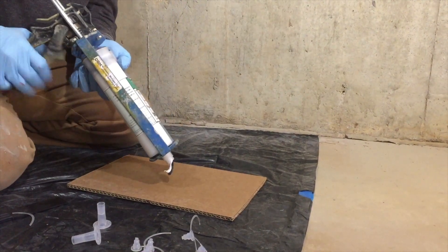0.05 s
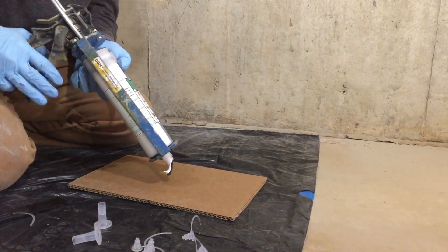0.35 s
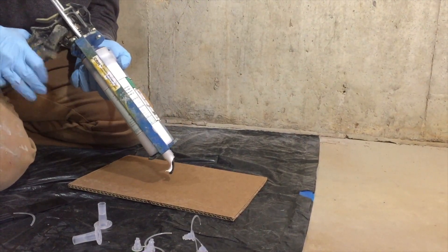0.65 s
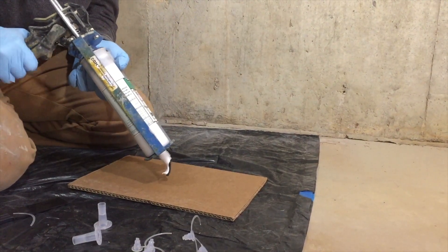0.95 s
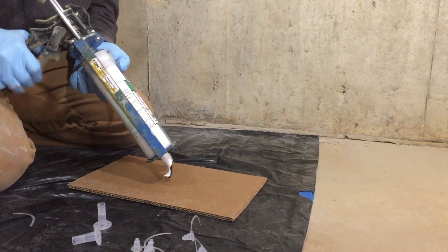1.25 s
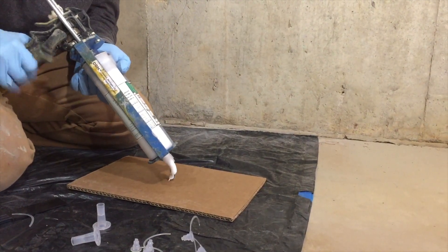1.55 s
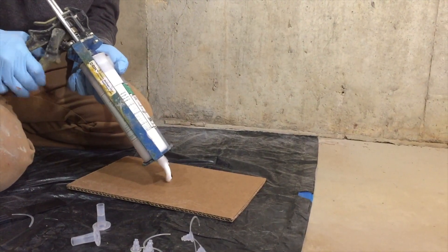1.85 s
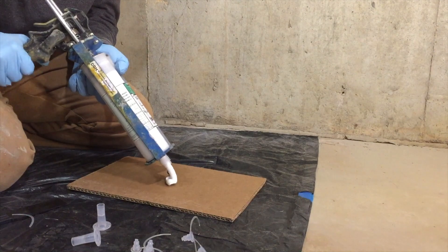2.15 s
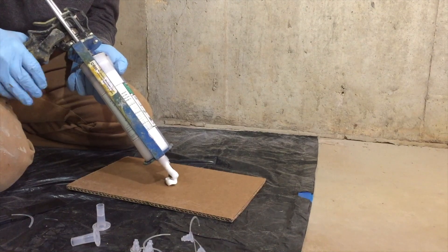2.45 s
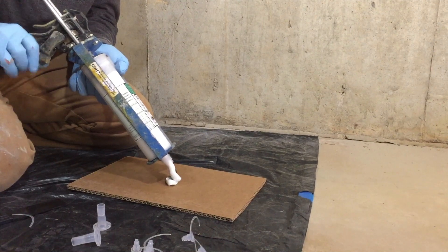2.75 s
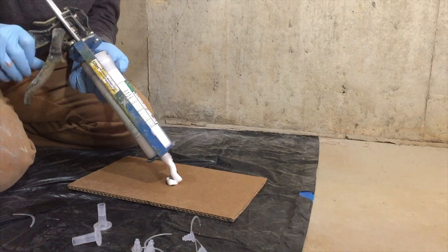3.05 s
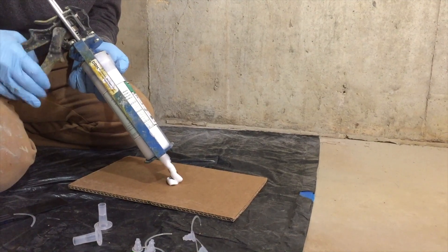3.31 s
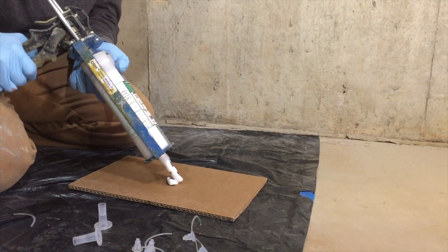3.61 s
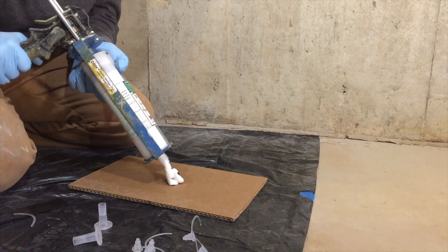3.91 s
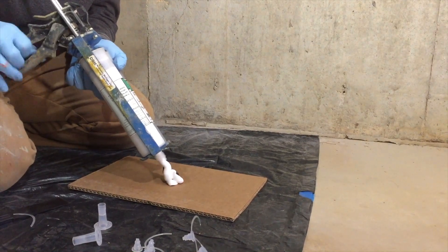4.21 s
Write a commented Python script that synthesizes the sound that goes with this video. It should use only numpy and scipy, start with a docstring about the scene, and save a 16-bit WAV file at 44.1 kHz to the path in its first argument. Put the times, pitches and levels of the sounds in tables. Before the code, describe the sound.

A hand-pumped dispensing gun is squeezed close to the microphone in a concrete basement, with a short echo and a quiet, steady rumble and electrical hum. In the first 0.8 seconds its plungers give brief high squeaks and let go with two sharp plastic snaps, at about 0.1 and 0.5 seconds, the loudest sounds, while the steel lever clacks several times. Light ticks follow, then a weaker snap at 1.4 seconds, a squeak at 1.6 and a single clack at 1.9. Around 2.6 seconds paste crackles very softly out of the nozzle. Near 3 seconds comes a quick falling squeak with a cluster of clacks, then a couple of faint ticks. Another falling squeak and light clicks come at about 4 seconds. Rubber gloves and sleeves rustle softly throughout, with a few dull bumps of hand and knee.

```python
"""A concrete basement, one microphone close to a hand-pumped two-cartridge dispensing gun.
Over room rumble and faint mains hum, the plungers squeak and let go with two sharp snaps while the
steel lever and drive plates clack. Lighter clacks, a weak third snap and more squeaks follow.
Near 2.6 s paste crackles softly from the nozzle; the gun squeaks and clacks again near 3 s and 4 s.
Gloves and sleeves rustle throughout, with a few soft bumps of hand and knee."""
import sys
import numpy as np
from scipy import signal
from scipy.fft import rfft, irfft
from scipy.io import wavfile

SR = 44100
rng = np.random.default_rng(int(sys.argv[2]) if len(sys.argv) > 2 else 0)


def store_wav(level_fs):
    """Save 16-bit WAV to argv[1]."""
    pcm = np.round(np.clip(np.atleast_2d(level_fs), -1, 1) * 32767)
    wavfile.write(sys.argv[1], SR, pcm.T.astype(np.int16))


N = 188351
TIME = np.arange(N) / SR

# room tone of the basement: (frequency [Hz], relative level [dB])
AIR_SPECTRUM = [(5, -1.5), (13, 8), (18, -1), (24, -9), (34, -6), (45, -15), (66, -10), (110, -22),
                (160, -20.5), (350, -30), (600, -30), (1000, -41), (2100, -38.5), (3200, -45), (4700, -40),
                (6000, -46), (16000, -56)]
# colour of the room's tail: (frequency [Hz], gain [dB])
TAIL_COLOUR = [(100, -5.5), (1000, 0), (3000, -5), (5200, -5.5), (6200, -6.5), (8800, -12), (11000, -8),
               (15000, -19)]
# reflections off the nearby floor and wall: (delay [s], gain [dB])
EARLY_ECHOES = [(.0033, -18.5), (.0072, -20), (0.0128, -12.5), (0.0184, -18), (0.027, -14.5)]
# hand and knee: (time [s], level [dB], half length [s], band centre [Hz])
SOFT_BUMPS = [(0.101, -60, 0.0091, 160), (0.157, -64, 0.018, 200), (0.324, -55.5, 0.0062, 204),
              (0.696, -54, 0.0037, 187), (0.81, -64.5, 0.017, 216), (1.33, -62.5, 0.013, 181),
              (1.503, -66.5, 0.039, 166), (1.908, -49, 0.0028, 164), (2.065, -60, 0.026, 230.5),
              (2.363, -74.5, 0.25, 66.5), (2.988, -57.5, 0.013, 200), (3.547, -63, 0.026, 177)]
# sleeves brushing: (frequency [Hz], relative level [dB])
CLOTH_SPECTRUM = [(60, -4), (160, -3.5), (350, -3), (800, 5), (1400, -0.5), (2500, -2), (8000, -28.5)]
# rubber friction of gloves and plungers: (frequency [Hz], relative level [dB])
RUBBER_SPECTRUM = [(400, -37.5), (1400, -11.5), (2800, -5.5), (4800, -4.5), (6200, -15.5), (11000, -19),
                   (15000, -49.5)]
# hands and arms moving: (crest time [s], rise [s], fall [s], sleeve level [dB], glove level [dB])
ARM_MOVES = [(0.11, 0.37, 0.32, -66.5, -65), (0.43, 0.1, 0.17, -49.5, -61), (0.63, 0.23, 0.2, -81, -63.5),
             (0.85, 0.17, 0.14, -71.5, -53.5), (1.35, 0.075, 0.043, -66.5, -69),
             (1.53, 0.16, 0.15, -68.5, -59.5), (2.00, 0.15, 0.1, -65, -69.5),
             (2.76, 0.45, 0.05, -78.5, -73), (3.00, .05, 0.085, -62, -59), (3.54, 0.026, 0.16, -77.5, -75),
             (3.828, 0.12, 0.055, -80, -80), (4.26, 0.26, 0.059, -91, -69.5)]
# paste leaving the nozzle: (crest time [s], rise [s], fall [s], level [dB])
PASTE_SPURTS = [(2.56, 0.08, 0.091, -70), (2.73, 0.066, 0.089, -72.5), (3.83, 0.059, 0.045, -83)]
# plungers rubbing: (time [s], rise [s], fall [s], first pitch [Hz], crest pitch [Hz], last pitch [Hz],
# level [dB], first overtone gain [dB], roughness [factor])
PLUNGER_SQUEAKS = [ (0.0540, 0.027, 0.0074, 6300, 6520, 6800, -49, -35, 0.36),
                   (0.0816, 0.0053, 0.015, 6420, 6620, 6426, -35, -39, 0.26),
                   (0.2520, .024, .038, 1853, 2408, 2340, -37.5, -6, 0.84),
                   (0.4466, 0.0015, 0.017, 6100, 5650, 5320, -41, -17, 0.3),
                   (0.4670, 0.0031, 0.01, 11200, 10810, 10940, -33, -35, 0.63),
                   (0.6300, 0.039, 0.03, 2690, 2585, 2564, -49.5, -33, 0.67),
                   (1.044, .008, 0.026, 2405, 2897, 3050, -58, -16, 1.23),
                   (1.554, 0.0048, 0.0046, 7200, 5190, 4320, -47, -28, 1.04),
                   (1.5640, 0.0077, 0.036, 2410, 2281, 2637, -52.5, -9, 1.23),
                   (1.5853, 0.0064, 0.012, 2712, 2703, 2735, -31, -10, 0.36),
                   (1.6010, 0.0096, 0.0085, 2660, 2672, 2800, -42, -9, 0.67),
                   (2.9188, .005, 0.0061, 5487, 4880, 2290, -28, -19, 0.67),
                   (2.929, 0.01, 0.0073, 1893, 1720, 1700, -47, -25, .65),
                   (4.0326, 0.0036, 0.0018, 9100, 8580, 8140, -27, -29, 0.29),
                   (4.0370, 0.006, 0.0019, 8710, 4460, 4220, -28.5, -16, 0.32),
                   (4.0450, 0.0031, 0.0089, 4160, 3660, 3510, -38, -31, 0.77),
                   (4.2210, 0.006, 0.012, 2780, 3160, 2990, -55, -12, 1)]
# resonances of the gun's frame: (frequency [Hz], width [Hz], gain [dB])
FRAME_MODES = [(1390, 400, -3.5), (1784, 130, 6.5), (2380, 930, 4), (3143, 300, 13.5), (3195, 240, 13),
               (4170, 550, 10), (5070, 1600, -4.5), (7530, 260, 1.5), (10000, 600, -18.5)]
# lever and drive plates meeting: (time [s], play taken up beforehand [s], level [dB], decay [s],
# treble gain [dB], bass gain [dB], lever ring gain [dB])
STEEL_CLACKS = [ (0.0135, 0.0068, -35.5, 0.0036, -2, -0.5, -22), (0.1289, 0, -35.5, .004, -12, 5.5, -3),
                (0.3178, 0.0013, -31.5, 0.0054, 6, -4, -15), (0.3972, 0, -43.5, 0.0035, 11, -16, 0),
                (0.6952, 0.0023, -29.5, 0.0092, 3.5, -1, -16), (0.7824, 0.0046, -37.5, 0.004, 4.5, 4.5, -2),
                (1.054, 0, -57.5, .006, -13, -20, -7), (1.1039, 0.013, -51, 0.0032, -30, 7, 1.5),
                (1.2131, 0.0034, -56, 0.013, 8.5, -29, -18), (1.271, 0, -60.5, 0.0084, 8, -13, -18),
                (1.3090, 0.0069, -55, 0.002, 10, -3.5, -5), (1.4064, 0, -40, 0.0032, -30, 3, -14.5),
                (1.9057, 0.0044, -33.5, 0.0058, 7.5, 4.5, -5), (2.338, 0.0026, -60, .0035, 17, 1, -8),
                (2.916, .011, -41.5, 0.011, -1.5, 0.5, 3.5), (2.937, 0.012, -47.5, 0.031, 2, -11, -17.5),
                (2.9687, 0.004, -38, 0.0069, 1, -1.5, -1), (3.2450, 0, -56.5, 0.0034, 1, 10, -1.5),
                (3.2930, 0.0017, -54, 0.014, -6, 7, 6), (4.0293, 0.0039, -52, 0.0065, -1.5, 5, 13.5),
                (4.119, 0, -52.5, 0.005, -13, -12, -14), (4.222, 0.0061, -55.5, 0.0065, -20, -16, -26)]
# modes of the plastic cartridge: (frequency [Hz], relative level [dB], time to fall 60 dB [s])
CARTRIDGE_MODES = [(1720, -7, 0.01), (2890, 1, 0.008), (3665, 3.5, 0.037), (4390, 1.5, 0.025),
                   (5110, -1, 0.01078), (7200, -19, 0.008), (10200, -20, 0.028)]
# plungers letting go: (time [s], level [dB], ring length [factor], crack gain [dB], pitch [factor])
PLUNGER_SNAPS = [(0.1288, -17.5, 0.85, -7, .99), (0.5042, -19.5, 0.85, -6.5, 0.99),
                 (1.4051, -31, 0.65, -20, 1.05)]


def from_db(db):
    """Decibels to gain."""
    return 10 ** (np.asarray(db) / 20)


def unit_rms(x):
    """Scale to an rms of 1."""
    return x / np.sqrt(np.mean(x ** 2) + 1e-20)


def at_hz(points, hz):
    """Read a table on a log-frequency axis."""
    frequencies, values = np.transpose(points)
    return np.interp(np.log(np.maximum(hz, 1)), np.log(frequencies), values)


def coloured(noise, spectrum):
    """Give a noise its spectrum, at an rms of 1."""
    gain = from_db(at_hz(spectrum, np.fft.rfftfreq(N, 1 / SR)))
    return unit_rms(irfft(rfft(noise) * gain, N))


def drift(per_s):
    """Random wander with an rms of 1, heading for a new value per_s times a second."""
    return unit_rms(np.interp(TIME * per_s, np.arange(N), rng.standard_normal(N)))


def filtered(x, hz, kind, order=2):
    """Causal Butterworth filter."""
    return signal.sosfilt(signal.butter(order, hz, kind, fs=SR, output="sos"), x + 1e-18)


def resonance(x, hz, width_hz):
    """Two-pole resonance with a peak gain of 1."""
    radius = np.exp(-np.pi * width_hz / SR)
    feedback = [1, -2 * radius * np.cos(2 * np.pi * hz / SR), radius ** 2]
    return signal.lfilter(np.array([1, 0, -1]) * (1 - radius ** 2) / 2, feedback, x + 1e-18)


def add(out, start_s, sound):
    """Mix a short sound in."""
    i = max(round(start_s * SR), 0)
    out[i:i + len(sound)] += sound[:N - i]


def swells(rows, swell_db=13.5):
    """Gain of swells that climb swell_db over their rise and lose it over their fall; powers add."""
    power = 0
    for crest, rise, fall, db in rows:
        away = np.maximum((crest - TIME) / rise, (TIME - crest) / fall)
        power += from_db(db - swell_db * away) ** 2
    return np.sqrt(power)


def room_tone(air_db=-57, hum_hz=120, hum_db=-72.5):
    """The basement by itself: rumbling air and mains hum."""
    air = from_db(air_db) * coloured(rng.standard_normal(N), AIR_SPECTRUM)
    hum = from_db(hum_db) * np.sqrt(2) * np.sin(2 * np.pi * hum_hz * TIME)
    return air + hum


def basement(direct, t60_s=.62, absorb_hz=10500, wet_db=-1, build_up_s=.0037, echo_cut_hz=8500):
    """The microphone gets the direct sound, dull echoes off floor and wall, then a diffuse tail."""
    t, band_edges = TIME[:SR], np.geomspace(80, 17000, 30)
    noise, bins = rfft(rng.standard_normal(SR)), np.fft.rfftfreq(SR, 1 / SR)
    tail, early = np.zeros((2, SR))
    for low, high in zip(band_edges, band_edges[1:]):
        hz = np.sqrt(low * high)
        band_t60 = t60_s / (1 + (hz / absorb_hz) ** 2)  # air absorbs the treble sooner
        envelope = from_db(-60 * t / band_t60) * (1 - np.exp(-t / build_up_s))
        band = irfft(noise * ((bins >= low) & (bins < high)), SR)
        tail += from_db(wet_db + at_hz(TAIL_COLOUR, hz)) * band * envelope / np.linalg.norm(envelope)
    for delay, db in EARLY_ECHOES:
        early[round(delay * SR)] += from_db(db)
    response = tail + filtered(early, echo_cut_hz, "low")
    return direct + signal.fftconvolve(direct, response)[:N]


def bumps(band_ratio=1.7):
    """Padded contacts of hand and knee swell and fade as a dull rumble."""
    out = np.zeros(N)
    for time, db, half_length, hz in SOFT_BUMPS:
        rumble = unit_rms(filtered(rng.standard_normal(N), [hz / band_ratio, hz * band_ratio], "band"))
        out += from_db(db) * rumble * np.exp(-.5 * ((TIME - time) / half_length) ** 2)
    return out


def rustle(sleeve_hold_db=-92, glove_hold_db=-88):
    """Sleeves brush dully and gloves rub brightly in uneven catches, faintly even while just holding."""
    sleeve = swells([(*timing, db) for *timing, db, _ in ARM_MOVES]) + from_db(sleeve_hold_db)
    glove = swells([(*timing, db) for *timing, _, db in ARM_MOVES]) + from_db(glove_hold_db)
    cloth_catch, rubber_catch = from_db(2.2 * drift(per_s=120)), from_db(1.5 * drift(per_s=300))
    cloth = coloured(rng.standard_normal(N) * cloth_catch, CLOTH_SPECTRUM)
    rubber = coloured(rng.standard_normal(N) * rubber_catch, RUBBER_SPECTRUM)
    return sleeve * cloth + glove * rubber


def paste_crackle(bursts_per_s=800):
    """Tiny air pockets burst in the bead at the nozzle, each ringing at one of several pitches."""
    bursts = (rng.random(N) < bursts_per_s / SR) * rng.standard_normal(N)
    pitches_hz = np.array([600, 1800, 2050, 2400, 3950, 4400, 4800, 5150, 9500])
    widths_hz = 450 * np.sqrt(pitches_hz / 4000)  # low pockets ring longer
    pocket = rng.integers(0, len(pitches_hz), N)
    crackle = sum(resonance(bursts * (pocket == k), hz, widths_hz[k]) for k, hz in enumerate(pitches_hz))
    return swells(PASTE_SPURTS) * unit_rms(crackle)


def plunger_squeaks(jitter=.034, flutter_db=3, overtone_fall_db=7, scrape_db=-9, edge_db=9.5):
    """Stick-slip gives a gliding tone with weak overtones; rough contact shakes it and adds a scrape."""
    out, waver, flutter = np.zeros(N), drift(per_s=1500), drift(per_s=500)
    friction = coloured(rng.standard_normal(N), RUBBER_SPECTRUM)
    for start, rise, fall, first_hz, crest_hz, last_hz, crest_db, overtone_db, rough in PLUNGER_SQUEAKS:
        end = start + rise + fall
        span = (TIME >= start) & (TIME <= end)
        t = TIME[span]
        stage = np.interp(t, [start, start + rise, end], [-1, 0, 1])
        hz = np.interp(stage, [-1, 0, 1], [first_hz, crest_hz, last_hz])
        db = crest_db - edge_db * np.abs(stage) ** 2.14  # a rounded crest
        phase = 2 * np.pi * np.cumsum(hz * (1 + rough * jitter * waver[span])) / SR
        tone = np.sin(phase)
        for k in range(2, 7):
            tone += from_db(overtone_db - overtone_fall_db * (k - 2)) * np.sin(k * phase) * (k * hz < SR / 2)
        slips = 1 + .5 * np.sin(phase)  # the scrape is strongest at each slip
        scrape = from_db(scrape_db) * rough ** 2 * friction[span] * slips
        fade = np.clip(np.minimum(t - start, end - t) / .001, 0, 1)  # 1 ms at each end
        out[span] += (np.sqrt(2) * tone + scrape) * fade * from_db(db + rough * flutter_db * flutter[span])
    return out


def steel_contacts(touch_db=-7.5, touch_tilt_db=1, rebound_s=.011, rebound_db=-12, rebound_tilt_db=-4.5):
    """Each clack is three contacts: a light, bright touch, the main blow and a dull rebound."""
    for time, play, db, decay, treble_db, bass_db, ring_db in STEEL_CLACKS:
        yield (time - play, db + touch_db, decay,
               treble_db + touch_tilt_db, bass_db - touch_tilt_db, ring_db - touch_tilt_db)
        yield time, db, decay, treble_db, bass_db, ring_db
        yield (time + rebound_s, db + rebound_db, decay,
               treble_db + rebound_tilt_db, bass_db - rebound_tilt_db, ring_db)


def lever_clacks(grain_db=3, frame_db=5, tick_db=-4, knock_db=-2, lever_db=12, lever_hz=1158):
    """Each steel contact is a dying chatter of tiny impacts that rings the frame and the lever."""
    frame, treble, bass, lever = np.zeros((4, N))
    t = TIME[:SR // 8]
    for time, db, decay, treble_db, bass_db, ring_db in steel_contacts():
        envelope = np.exp(-t / decay)
        chatter = envelope * rng.standard_normal(len(t)) * from_db(grain_db * rng.standard_normal(len(t)))
        blow = from_db(db) * chatter * np.linalg.norm(envelope) / np.linalg.norm(chatter)
        add(frame, time, blow)
        add(treble, time, blow * from_db(treble_db))
        add(bass, time, blow * from_db(bass_db))
        add(lever, time, blow * from_db(ring_db))
    body = sum((-1) ** k * from_db(db) * resonance(frame, hz, width)
               for k, (hz, width, db) in enumerate(FRAME_MODES))
    tick = filtered(filtered(treble, 5200, "high"), 11500, "low")
    knock = filtered(bass, [130, 1500], "band", order=1)
    ring = resonance(resonance(lever, lever_hz, width_hz=243), lever_hz, width_hz=243)
    return (from_db(frame_db) * body + from_db(tick_db) * tick
            + from_db(knock_db) * knock + from_db(lever_db) * ring)


def plunger_snaps(crack_decay_s=.00389, contact_hz=11000, rebound_db=-5):
    """A plunger lets go and rebounds once: a short crack and the damped modes of the cartridge."""
    out, t = np.zeros(N), TIME[:SR // 10]
    for time, db, length, crack_db, pitch in PLUNGER_SNAPS:
        ring = sum((-1) ** k * from_db(level - 60 * t / (t60 * length)) * np.sin(2 * np.pi * hz * pitch * t)
                   for k, (hz, level, t60) in enumerate(CARTRIDGE_MODES))
        hiss = filtered(rng.standard_normal(len(t)), [2400, 7000], "band", order=1)
        crack = from_db(crack_db) * hiss * np.exp(-t / crack_decay_s)
        snap = from_db(db) * (ring + crack)
        add(out, time, snap)
        add(out, time + .0034 * length, from_db(rebound_db) * snap)
    return filtered(filtered(out, 1300, "high", order=1), contact_hz, "low", order=4)


def scene():
    """Gun and hands close to one microphone, with the basement's echo and room tone around them."""
    gun = plunger_snaps() + lever_clacks() + plunger_squeaks() + paste_crackle()
    handling = rustle() + bumps()
    return (basement(gun + handling) + room_tone())[None]


def record(dry, cutoff_hz=15800):
    """The microphone signal passes a steep treble cut."""
    return signal.sosfilt(signal.ellip(10, .1, 80, cutoff_hz, fs=SR, output="sos"), dry)


dry = scene()
out = record(dry)
store_wav(out)
```